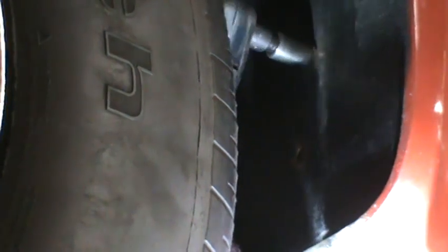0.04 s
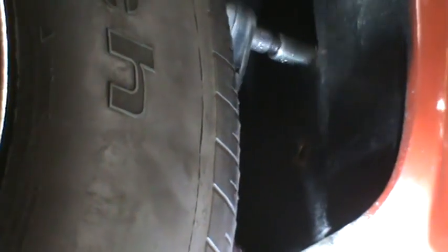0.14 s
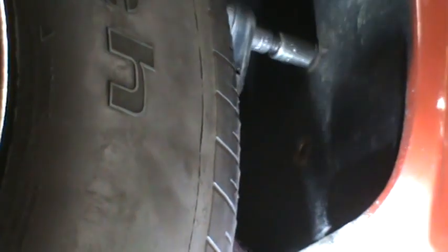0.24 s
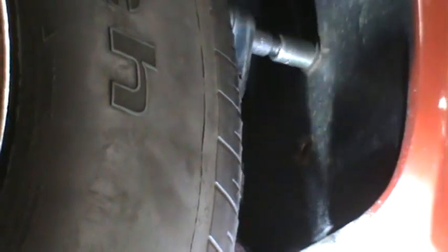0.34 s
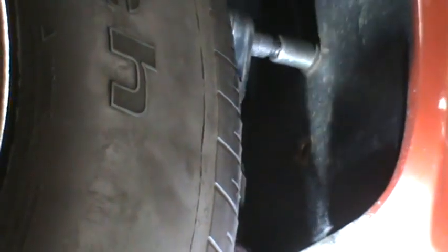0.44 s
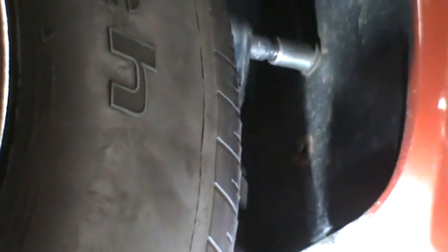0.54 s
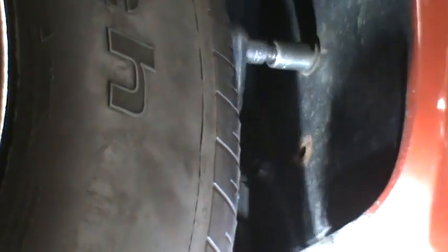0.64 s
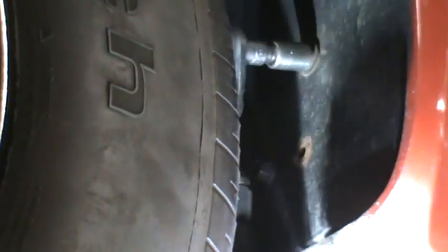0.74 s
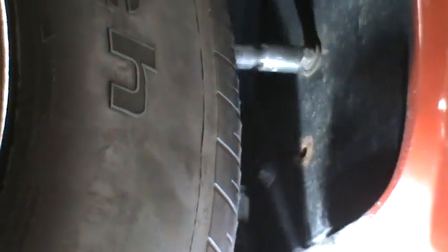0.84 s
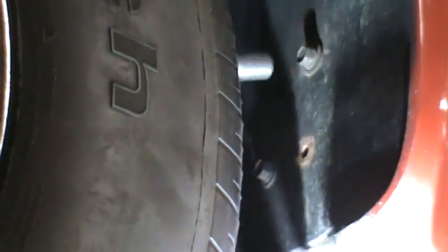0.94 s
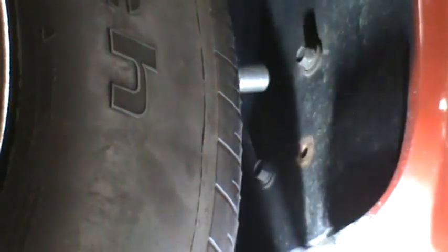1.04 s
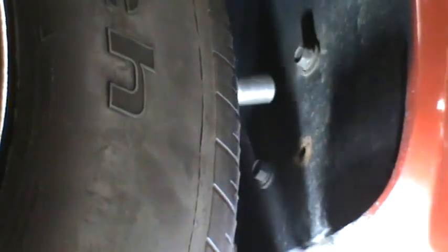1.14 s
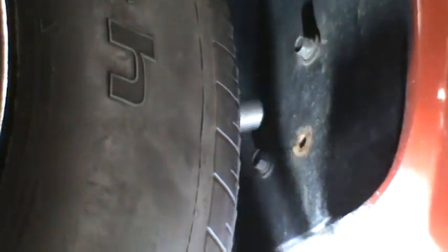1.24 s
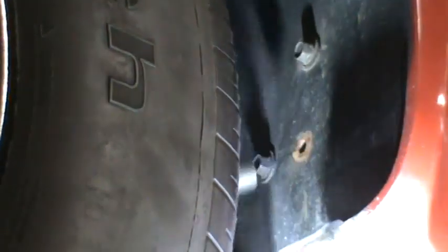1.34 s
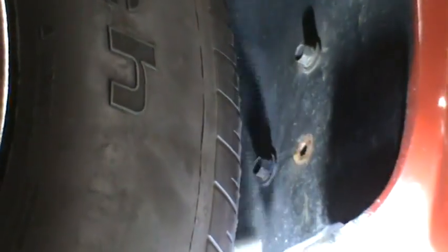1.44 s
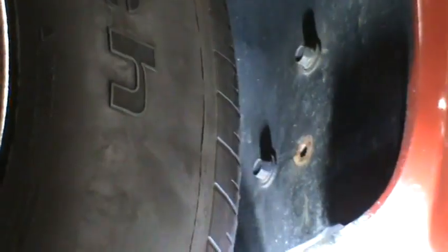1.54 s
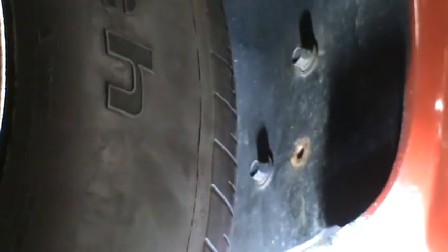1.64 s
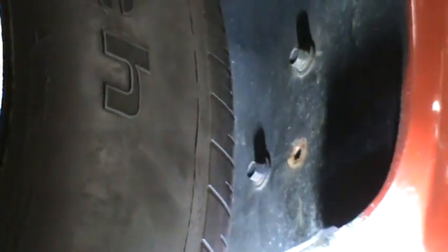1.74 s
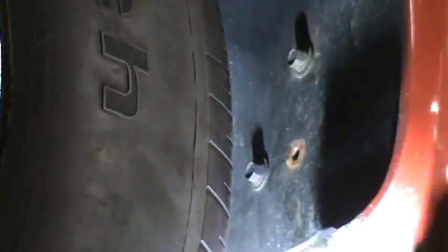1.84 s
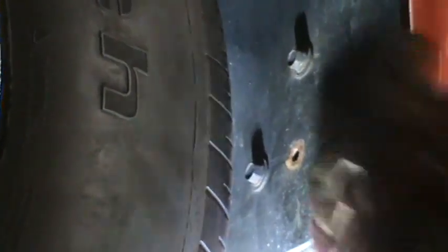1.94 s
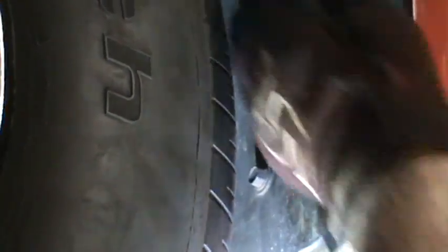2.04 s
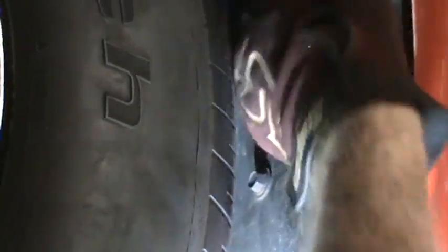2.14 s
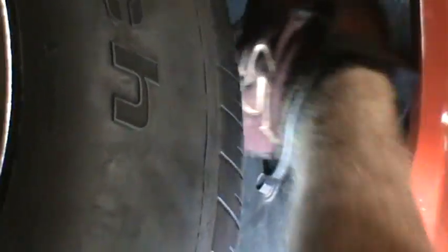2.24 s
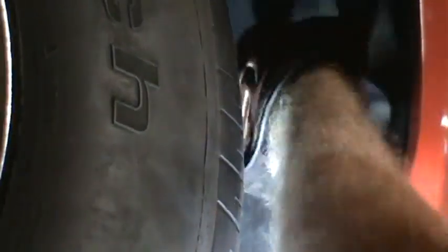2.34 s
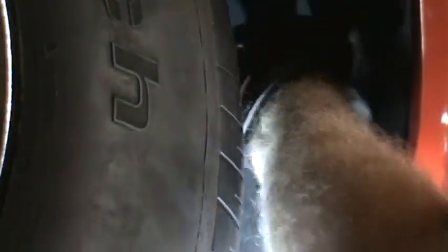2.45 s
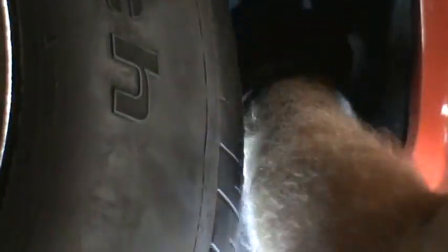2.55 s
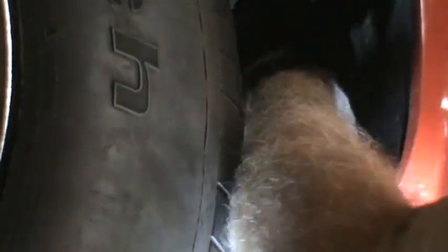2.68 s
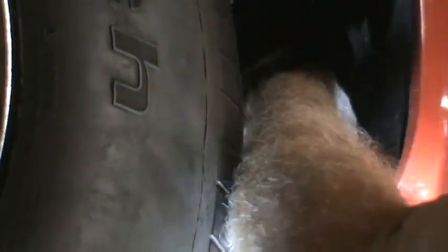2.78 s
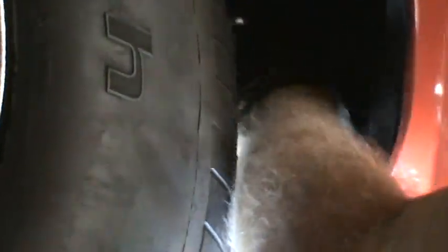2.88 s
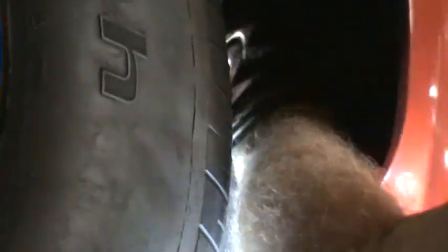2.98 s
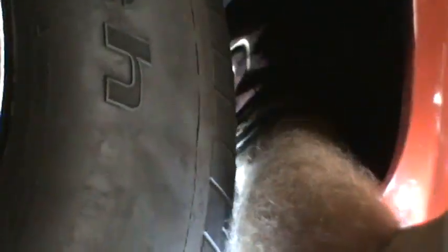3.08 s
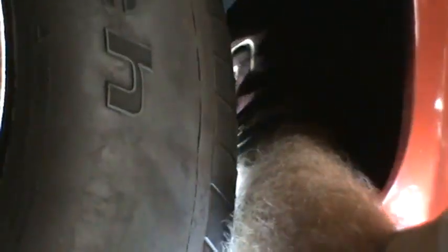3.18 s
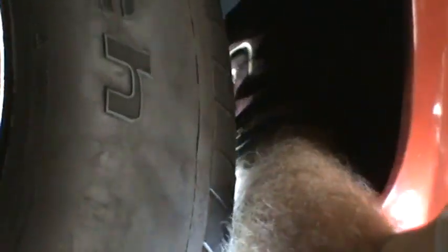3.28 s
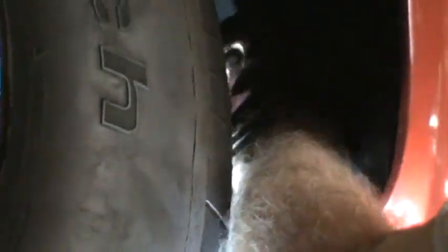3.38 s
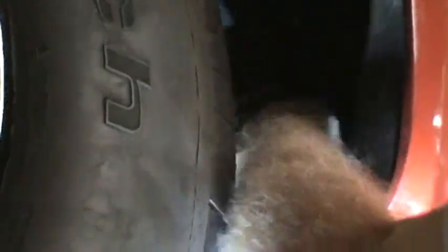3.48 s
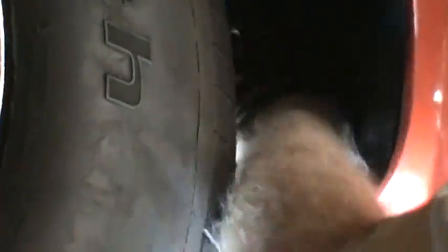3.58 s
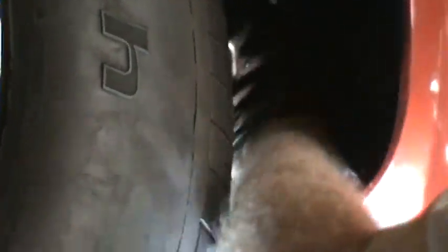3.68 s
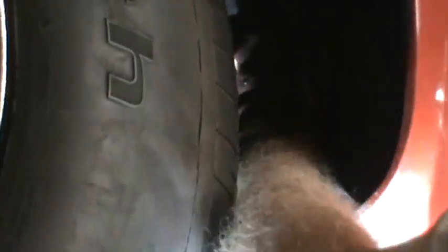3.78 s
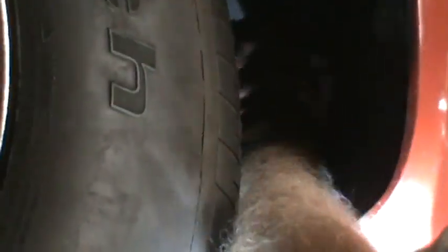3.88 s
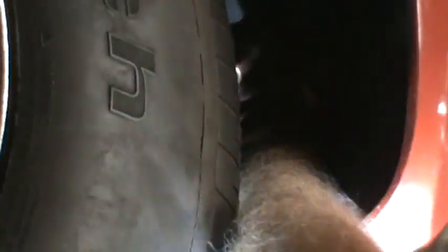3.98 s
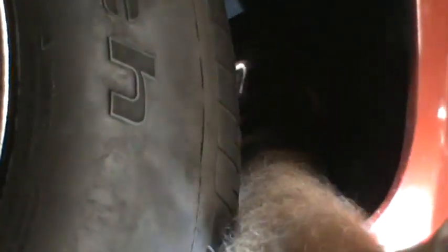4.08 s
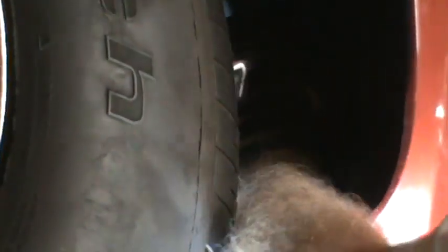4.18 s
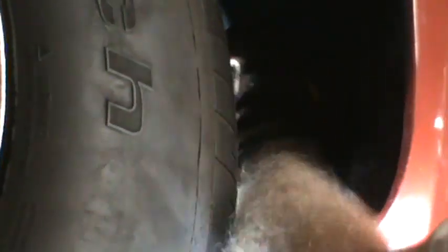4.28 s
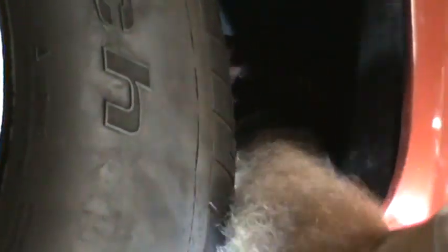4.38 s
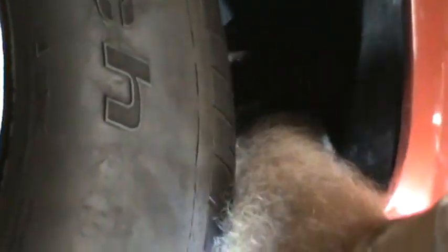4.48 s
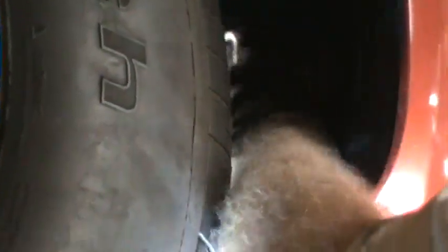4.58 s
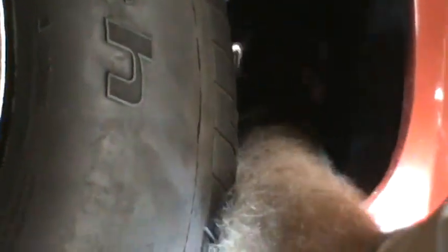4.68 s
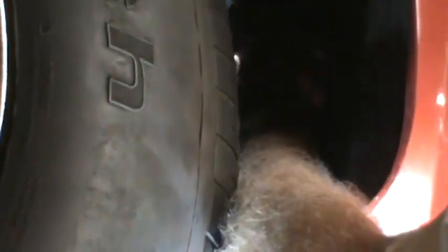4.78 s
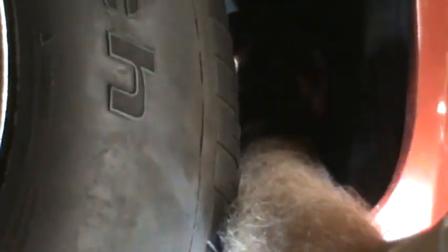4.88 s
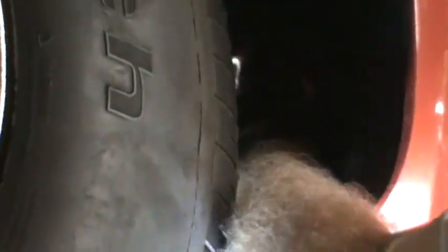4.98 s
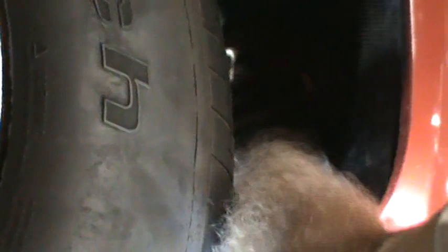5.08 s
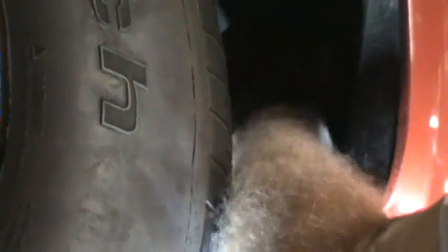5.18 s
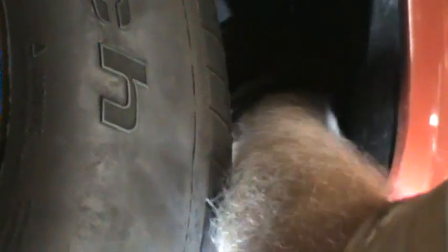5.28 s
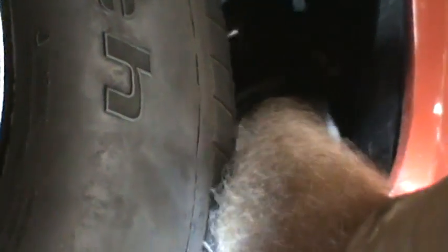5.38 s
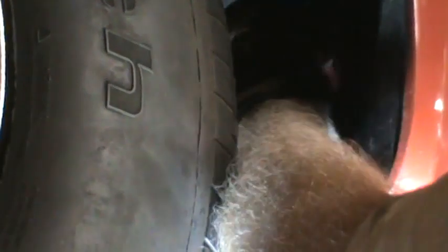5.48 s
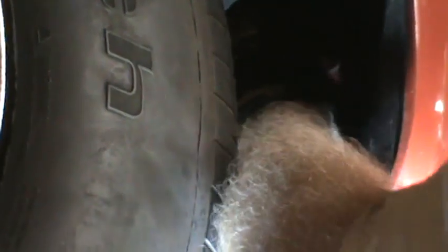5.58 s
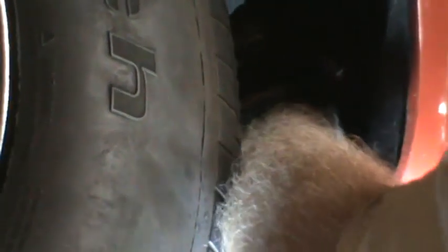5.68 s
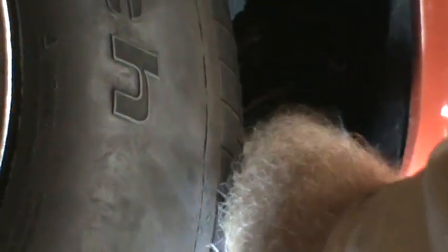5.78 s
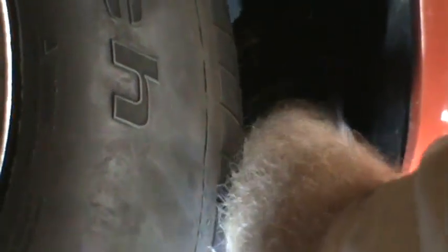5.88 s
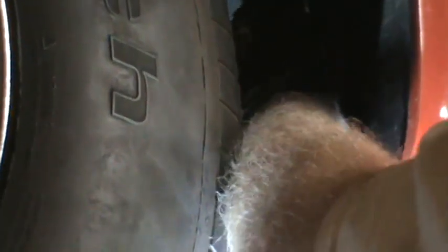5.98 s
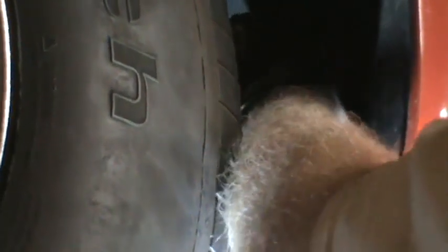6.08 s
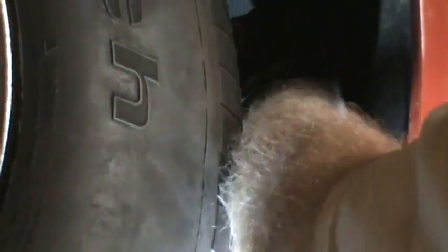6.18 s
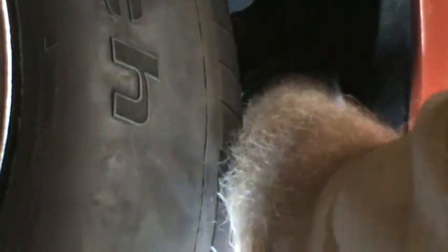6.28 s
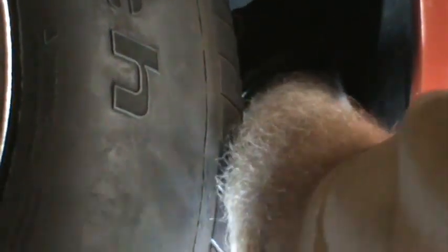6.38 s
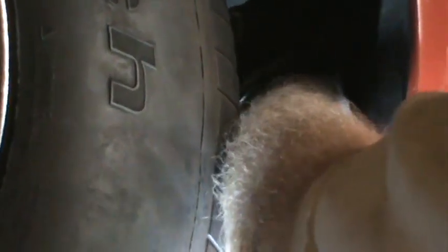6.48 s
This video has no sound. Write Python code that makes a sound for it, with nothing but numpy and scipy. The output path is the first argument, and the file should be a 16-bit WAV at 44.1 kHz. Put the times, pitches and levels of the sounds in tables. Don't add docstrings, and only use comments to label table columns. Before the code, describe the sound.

An air ratchet whines over rushing air for a second, coasts down, then metal parts knock and two heavy hollow blows ring through a garage.

```python
import sys
import numpy as np
from scipy import signal
from scipy.fft import rfft, irfft, next_fast_len
from scipy.io import wavfile
from scipy.ndimage import uniform_filter1d, minimum_filter1d, map_coordinates

SR = 44100
rng = np.random.default_rng(int(sys.argv[2]) if len(sys.argv) > 2 else 0)


def invert_db(level):
    return 10 ** (np.asarray(level, dtype=float) / 20)


def generate_wav(sig):
    pcm = np.round(np.clip(np.atleast_2d(sig).T, -1, 1) * 32767).astype(np.int16)
    wavfile.write(sys.argv[1], SR, pcm)


N = 287973

SHUT_S = 1.046
# (frequency [Hz], likeness [-1..1])
ROOM_ALIKE = [(60, 0.2), (200, 1), (1000, 0.73), (4000, 0.7), (12000, 0.5)]


def ratchet():
    # (frequency [Hz], level difference [dB])
    air_side = [(60, 5), (230, 8.6), (870, 1.8), (3310, 2.8), (12600, 1.59)]
    # (time [s], peak [dB], frequency [Hz], t60 [s])
    flares = [(1.05, -19, 2010, .15), (1.071, -12, 805, .06), (1.095, -23, 600, .05),
              (1.092, -23, 1085, 0.092), (1.12, -24, 710, .3), (1.235, -34.5, 1992, 0.28),
              (1.4, -54, 1995, 0.55)]
    shut = np.maximum(np.arange(N) / SR - SHUT_S, 0)
    whine = vane_whine()
    puffs, thin = coasting_puffs(shut)
    air = exhaust(shut)
    far = filtered(whine[:52000], lambda f: invert_db(along(((2100, -13), (2900, -2)), f)))
    wet = garage(far + invert_db(-7.5) * air[0, :len(far)])
    wet = wet + invert_db(-4.5) * garage(thin + 0.44 * puffs * (shut < .2))
    modes = damped_notes(flares, rise=0.0122, rough=.01, size=SR // 2)
    return leaning(whine + puffs + air + wet + modes, air_side)


def vane_whine():
    # (time [s], vane rate [Hz], whine [dB])
    motor = [(0.0, 839.3, -29.5), (0.03, 1001, -21), (0.055, 1030, -23), (0.19, 1001, -24),
             (0.356, 978.5, -19.5), (0.538, 980.3, -14), (0.86, 1002, -19), (1.022, 987, -17),
             (1.036, 1010, -35.5)]
    # (time [s], depth [dB], half length [s])
    nulls = [(0.046, 5, .01), (0.129, 14, 0.01), (0.235, 4, 0.023), (.77, 3, .05), (.812, 12, 0.015),
             (0.907, 6, .02)]
    # (multiple of vane rate, level at 1000 Hz [dB], slope [dB per percent of speed])
    vane_orders = [(1, -41.5, 1.5), (3, -31.5, 2), (4, -46, -5.5), (5, -30, .8), (6, -37, 3.5),
                   (7, -53, -4.5), (8, -34, 2), (9, -40, 4.5), (10, -37.5, -4), (11, -37.5, -2.3)]
    sway_db, whine_sway_db = 1.7, .8
    t = np.arange(N) / SR
    hz, whine_db, on = curves(motor)
    for s, depth_db, half in nulls:
        whine_db = whine_db - depth_db * np.exp(-((t - s) / half) ** 2)
    turn = 2 * np.pi * np.cumsum(hz * (1 + 0.0022 * wobble(60))) / SR
    sway = wobble(14)
    whine = invert_db(whine_db + 3.0 + whine_sway_db * wobble(30)) * np.sin(2 * turn)
    speed_percent = np.clip(hz / 10 - 100, -3, 2)
    for k, db, slope_db in vane_orders:
        level_db = db + slope_db * speed_percent + sway_db * np.roll(sway, -k * 9000)
        whine = whine + invert_db(level_db) * np.sin(k * turn)
    return on * whine


def coasting_puffs(shut):
    # (delay [s], gain)
    walls = [(.024, .3), (.046, 0.45), (.07, .15)]
    coast_hz, coast_s = 1079, .04
    level_db, rise_s, fade_s = -12.5, 0.01, 0.033
    turn = 2 * np.pi * coast_hz * coast_s * (1 - np.exp(-shut / coast_s))
    swell = np.minimum(shut / rise_s, 1) ** 2 * np.exp(-(shut / fade_s) ** 2) * (shut < .12)
    puffs = swell * invert_db(level_db + 1.1 * wobble(400)) * (np.sin(turn) + 0.089 * np.sin(2 * turn))
    thin = np.pad(filtered(puffs[:60000], lambda f: band(f, 410, 1400)), (0, N - 60000))
    puffs = puffs + sum(gain * np.roll(thin, round(delay * SR)) for delay, gain in walls)
    return puffs, thin


def exhaust(shut):
    # (frequency [Hz], level [dB per Hz])
    hiss = [(710, -50), (1200, -23), (1850, -12.5), (1940, -12), (2300, -13.5), (4620, -15), (5000, -12),
            (5460, -14), (10100, -10), (12000, -14), (12600, -54), (16400, -83), (22000, -120)]
    roar = [(35, -78.5), (120, -24), (235, -7.5), (366, -9.5), (440, -3), (777, -1), (1110, -3.5),
            (1800, -3), (2340, -35.5), (3960, -120)]
    # (frequency [Hz], likeness [-1..1])
    air_alike = [(60, 0.55), (200, 0.95), (600, 1), (2000, 0.31), (8000, 0.82), (12300, 0.37)]
    surge_db, surge_s, drain_db_per_s = 3.5, 0.014, 203
    kick_db, kick_s = 12.5, 0.017
    t = np.arange(N) / SR
    hiss_db = -20 + surge_db * np.exp(-((t - SHUT_S) / surge_s) ** 2) - drain_db_per_s * shut
    roar_db = -30 + kick_db * np.exp(-t / kick_s) + 3 * np.exp(-t / .25) - 60.0 * shut
    air = rush(hiss, air_alike, patchy_db=2.0, size=52000) * invert_db(hiss_db + 0.5)
    air = air + rush(roar, air_alike, patchy_db=1.5, size=52000) * invert_db(roar_db - 2.5)
    return air * np.clip((.12 - shut) / 0.032, 0, 1)


def knocks():
    # (time
    # [s], click or swish [dB], dull part over it [dB], bright part over it [dB])
    arch_hits = [(2.5461, -41.5, 11, -30), (2.9044, -46.5, 6, -21), (2.9169, -41.5, 2, 5.5),
                 (3.154, -52.5, 3, 0), (3.3603, -48.5, 12.5, -4), (3.4306, -51, -10, 1),
                 (3.4996, -10, -6.5, 0.5), (3.6214, -30.5, 5, -20), (3.6307, -15, -7, -18),
                 (4.1135, -38.5, -6, -14), (4.2085, -37, 2, -22), (4.2363, -30.5, 3, -6.5),
                 (4.2925, -30.5, -10, -22), (4.38, -37.5, 9.5, -21), (4.7282, -24.5, -10, -16),
                 (4.7978, -33, 6.5, -5.5), (4.8348, -28.5, 4.5, -11), (5.7329, -25, -14, -2),
                 (5.1865, -6.5, 0, -19), (5.428, -36, -10, -10)]
    clatter = [(1.7622, -37.5, -8, -32.5), (1.8198, -34.5, -4, -33), (1.875, -26, 3, -45),
               (1.9696, -24, -9, -16), (1.9948, -25, -10, -15), (2.0291, -36.5, 2.5, -11),
               (2.1898, -29, -3, -30), (2.3985, -31.5, -1.5, -8), (2.4691, -36, -2, -11),
               (6.1875, -37, -14, -20), (1.887, -31, 4.5, -40), (5.641, -8, -3, -24),
               (5.783, -20.5, 3.5, -30), (5.0105, -33, 5, -4), (4.634, -34.5, 9.5, -8)]
    swishes = [(1.37, -64, -10, 14), (1.985, -31, -6, -15), (2.2915, -48, -18, 1),
               (2.6401, -34.5, -8, -8.5), (2.775, -42.5, 4.5, -20), (3.922, -38.5, 1.5, -5),
               (4.027, -41.5, -12, -7), (4.5094, -33, -3, -4.5), (5.9704, -28.5, 0.5, -11),
               (6.27, -42, 3, -20), (2.98, -50, -1, -11), (3.42, -48.5, -3, -3), (4.8, -35.5, -8, -0.5),
               (4.99, -41, -3, 3)]
    # (frequency [Hz], width [Hz], level [dB])
    box = [(252, 96, -3), (445, 112, 0), (867, 300, 3)]
    # (time [s], peak [dB], frequency [Hz])
    panel = [(2.545, -37.5, 543), (2.569, -38, 550), (2.795, -41, 600), (2.906, -44, 529),
             (3.362, -42, 518), (3.428, -38, 610), (3.488, -33, 570), (3.504, -23.5, 613),
             (3.539, -28.5, 577), (3.63, -20, 598), (3.684, -35, 590), (3.945, -43, 610),
             (4.12, -46.5, 595), (4.21, -40, 630), (4.237, -41, 641), (4.29, -41, 600), (4.381, -27, 608),
             (4.409, -30, 549), (4.636, -27, 622), (4.682, -24.5, 610), (4.727, -27.5, 616),
             (4.78, -34.5, 608), (4.829, -28, 530), (4.859, -32, 529), (5.011, -29.5, 604)]
    bumps = [(1.88, -44, 265), (1.972, -36, 242), (2.021, -40, 317), (2.107, -50, 286), (2.188, -49.5, 298),
             (2.549, -58, 265), (2.796, -46, 271), (3.191, -46, 239), (3.365, -40.5, 243), (3.5, -36, 207),
             (3.571, -41, 314), (3.721, -48, 282), (4.123, -48, 239), (4.245, -35.5, 281.5),
             (4.393, -43, 221), (4.474, -42, 246), (4.541, -46, 224), (4.642, -36.5, 267),
             (4.709, -40, 219), (4.791, -32.5, 241), (4.866, -38, 242), (5.016, -35.5, 249)]
    # (time [s], peak [dB], frequency [Hz], t60 [s])
    floor_thuds = [(1.382, -43, 123, 0.22), (5.19, -29.5, 140, 0.91), (5.607, -27, 190, 1.5),
                   (5.187, -36, 38, .7), (5.187, -35, 75, 0.57), (5.2, -32, 150, .6), (.28, -53.5, 60, .12),
                   (1.05, -56, 45, .4), (5.61, -35, 48, 2)]
    panel_t60, bump_t60 = .125, 0.16
    sheet = damped_notes([(*row, panel_t60) for row in panel], rise=0.003, rough=0.041)
    sheet = sheet + damped_notes([(*row, bump_t60) for row in bumps], rise=0.0031)
    sheet = sheet + invert_db(-13) * garage(sheet)
    hits = contacts(arch_hits, box, rise=0.00031, ring=1.8, t60=0.15, wet_db=-5.0, pan_db=3.0)
    hits = hits + contacts(clatter, box, rise=0.00074, ring=0.68, t60=0.12, wet_db=2.0, pan_db=2.0)
    hits = hits + contacts(swishes, box, rise=0.06, ring=0.4, t60=0.095, wet_db=-5.5, pan_db=2.5)
    thuds = damped_notes(floor_thuds, rise=0.0045, rough=0.0285, size=SR) * invert_db([[3.5], [-3.5]])
    return hits + thuds + sheet * invert_db([[1.2], [-1.2]])


def blows():
    # (time [s], strength [dB], shudder t60 [s], brightness [dB per octave], rise [s])
    strikes = [
        (5.184, -1, 0.053, 4.5, .003),
        (5.357, -16, 0.17, -21, 0.00029),
        (5.604, -1.5, 0.17, -1, 0.00039),
    ]
    # (frequency [Hz], level [dB per Hz])
    heavy = [(18, -72), (30, -59), (229, -4.5), (407, 1.5), (439, -1), (473, -2.5), (593, 2.5), (800, -5.5),
             (1170, -5), (1360, -5), (3100, -8), (7270, -30.5), (12000, -47), (15600, -105.5),
             (22000, -120)]
    # (frequency [Hz], level [dB], t60 [s])
    drum_first = [(345, -8.5, 1.4), (592, 0, 0.66), (700, -10, 3.6), (885, -11, 0.69), (1061, -9, 0.77),
                  (1193, -12, 0.56), (1766, -3, 0.34), (1955, -19, 0.68), (2277, -22, 0.92),
                  (2700, -15, 1.4), (2870, -8, 0.38), (2960, -13, 0.68), (3117, -9, 0.53), (3370, -4, 0.41)]
    drum_second = [(242, -12, 1.7), (358.5, -5, 0.75), (443, 2.5, 0.36), (585, -13, 0.86), (940, -16, 0.42),
                   (1084, -15, 0.6), (1200, -1.5, 0.43), (1400, -22, 0.54), (1550, -18, 0.6),
                   (1701, -20, 1.0), (2099, -4.5, 0.26), (2150, -11, 0.5), (2400, -26, 0.85),
                   (2611, -18, 0.58)]
    # (frequency [Hz], level difference [dB])
    blow_side = [(60, 2.5), (170, 12), (510, 5.5), (1480, 2.5), (4330, 1.5), (12600, 1.5)]
    out, t = 0, np.arange(SR) / SR
    lead = 2000
    for (s, db, t60, tilt_db, rise), drum in zip(strikes, (drum_first, drum_first, drum_second)):
        def colour(f):
            return invert_db(along(heavy, f) + tilt_db * np.log2(np.maximum(f, 1500) / 1500))

        def placed(x):
            return invert_db(db) * np.pad(x, [(0, 0)] * (x.ndim - 1) + [(round(s * SR), N)])[..., :N]

        attack = np.minimum(t / rise, 1)
        noise = filtered(paired(rng.standard_normal((2, SR)), ROOM_ALIKE), colour)
        shudder = 0.47 * unit(noise) * invert_db(-60 * t / t60) * attack
        ring = 0
        for hz, level_db, life in drum:
            level_db = level_db + rng.normal(0, 1)
            ring = ring + invert_db(level_db - 60 * t / min(life, 1.0)) * np.sin(2 * np.pi * hz * t)
        ring = 0.22 * ring / np.abs(ring).max() * attack
        click = np.eye(1, SR + lead, lead + 30 + round(rise * SR))[0]
        impact = filtered(click, colour)[lead:]
        out = out + placed(shudder + ring + 0.95 * impact / np.abs(impact).max())
        out = out + garage(placed(invert_db(25.5) * impact / np.linalg.norm(impact) + 1.7 * ring))
    return leaning(out, blow_side)


def pings():
    # (time [s], level [dB], frequency [Hz], t60 [s])
    steel_parts = [(1.876, -37, 3300, .06), (1.879, -33, 850, .12), (1.887, -33, 480, .15),
                   (1.894, -36, 900, .1), (1.9705, -35, 3000, .05), (1.992, -38, 3100, .06),
                   (2.191, -42, 3300, .06), (2.192, -38, 480, .1), (4.237, -36, 800, .06),
                   (2.399, -44, 980, .1), (3.502, -22, 1900, .15), (3.503, -23, 1500, .15),
                   (3.51, -24, 1680, .17), (3.632, -30, 1850, .12), (4.292, -36, 1480, .07),
                   (4.383, -42, 2650, .06), (4.64, -43, 2300, .08), (5.345, -31, 4850, .06),
                   (5.74, -33, 6990, .35), (5.731, -19, 6980, .08), (5.732, -32, 8750, .06)]
    # (time [s], frequency [Hz], width [Hz], level [dB], half length [s])
    slip = (4.182, 5850, 150, -57, .035)
    s, hz, width_hz, db, half = slip
    squeak = np.sin(2 * np.pi * np.cumsum(hz + width_hz * wobble(300)) / SR)
    swell = np.clip(1 - np.abs(np.arange(N) / SR - s) / half, 0, 1)
    ping = damped_notes(steel_parts[:-2], rise=0.00042, rough=0.079)
    ping = ping + damped_notes(steel_parts[-2:], rise=0.0011, rough=0.078)
    ping = ping + invert_db(-11) * garage(ping)
    return ping + invert_db(db) * squeak * swell


def background():
    # (time [s], level [dB])
    rub = [(1.7, -70), (1.95, -60), (2.8, -59.5), (3.26, -81), (3.43, -54), (3.6, -48), (3.75, -55.5),
           (4.03, -63), (4.39, -47), (4.6, -53), (4.75, -48.5), (4.93, -53.5), (5.12, -45.5), (5.3, -52.5),
           (5.62, -43), (5.86, -35), (6.1, -47.5), (6.53, -58.5)]
    # (frequency [Hz], level [dB per Hz])
    dull_colour = [(24, -53), (40, -9), (239, 7.5), (315, 0.5), (527, 3), (1110, -7.5), (1500, -11),
                   (1950, -53), (3300, -120)]
    bright_colour = [(710, -16.5), (1200, -0.5), (2770, -10), (3540, -12), (5680, -12.5), (9200, -19),
                     (11800, -20.5), (12600, -69), (16400, -75), (22000, -120)]
    room_colour = [(12, -30.5), (20, -9), (136, 3), (203, -7.5), (783, -16), (1270, -17), (2240, -17),
                   (9880, -28), (11600, -28), (12600, -32), (16400, -71), (22000, -120)]
    rub_db, on = curves(rub)
    lumps = on * invert_db(rub_db + 1.5 * wobble(25))
    dull = invert_db(2.0) * rush(dull_colour, [(100, 1.0), (2000, 1.0)], patchy_db=-2.0)
    bright = invert_db(-1.0) * rush(bright_colour, [(2000, 0.51), (12000, 0.41)], patchy_db=.8)
    ducked_db = -8 * np.clip((SHUT_S - np.arange(N) / SR) / .03, 0, 1)
    tone = rush(room_colour, [(50, 1.0), (500, 0.92), (10000, 0.27)], patchy_db=.6)
    tone = invert_db(-59.5 + ducked_db) * tone
    return (lumps * (dull + bright) + tone) * invert_db([[1.2], [-1.2]])


def contacts(table, body, rise, ring, t60, wet_db, pan_db):
    # (frequency [Hz], width [Hz], level [dB])
    socket = [(1620, 750, 5), (2045, 35, 16.5), (2770, 1430, 6.5), (5000, 500, -14), (9300, 1600, -2.5)]
    s, db, dull_db, tick_db = np.transpose(table)
    t = np.arange(SR // 4) / SR
    shock = rng.standard_normal((len(s), 3, len(t))) * np.minimum(t / rise, 1)
    shock = shock * invert_db(-60 * t / (t60 * np.array([[.6], [1], [.8]])))

    def voices(f):
        steel = 1.1 + ring * resonant(socket)(f)
        dull = resonant(body)(f) * band(f, 118, 1090)
        click = steel * band(f, 400, 3550) * band(f, 150, 6500)
        tick = steel * band(f, 4340, 12650) ** 2
        return np.array([dull, click, tick])

    parts = filtered(shock, voices)
    parts = parts / np.abs(parts).max(axis=2, keepdims=True)
    levels = invert_db(db[:, None] - 3.0 + np.transpose([dull_db, 0 * db, tick_db]))
    hits = np.sum(parts * levels[..., None], axis=1)
    dry = np.zeros((2, N + SR))
    for k, hit in enumerate(hits):
        dry[k % 2, round(s[k] * SR):][:len(t)] += hit
    wet = garage(dry[0, :N]) + garage(dry[1, :N])
    return (dry.sum(axis=0)[:N] + invert_db(wet_db) * wet) * invert_db([[pan_db / 2], [-pan_db / 2]])


def damped_notes(table, rise, rough=0.029, size=SR // 4):
    x, t = np.zeros(N + SR), np.arange(size) / SR
    for s, db, hz, t60 in table:
        drift = np.cumsum(rng.standard_normal(len(t))) * rough
        envelope = invert_db(db - 60 * t / max(t60, .01)) * np.minimum(t / rise, 1)
        x[round(s * SR):][:len(t)] += envelope * np.sin(2 * np.pi * hz * t + drift)
    return x[:N]


def rush(spectrum, alike, patchy_db, size=N):
    z = signal.stft(rng.standard_normal((2, size)), nperseg=1024)[2]
    field = uniform_filter1d(rng.standard_normal(z.shape[1:]), size=12, axis=0)
    field = uniform_filter1d(field, size=4, axis=1)
    pair = signal.istft(z * invert_db(patchy_db * unit(field)), nperseg=1024)[1][:, :size]
    return np.pad(unit(paired(pair, alike, spectrum)), ((0, 0), (0, N - size)))


def garage(x):
    # (frequency [Hz], t60 [s])
    room_t60 = [(60, 0.32), (170, 1.2), (300, 0.79), (700, 0.72), (2000, 0.64), (5000, 0.58), (11000, 0.36)]
    hz, t, z = signal.stft(rng.standard_normal((2, SR)), SR, nperseg=256)
    decay = invert_db(-60 * t / along(room_t60, hz)[:, None])
    tail = paired(signal.istft(z * decay, SR, nperseg=256)[1], ROOM_ALIKE)
    tail = tail * np.minimum(np.arange(tail.shape[1]) / (0.0038 * SR), 1)
    tail = np.pad(tail, ((0, 0), (150, 0)))
    first, last = np.flatnonzero(x)[[0, -1]]
    wet = signal.fftconvolve(x[None, first:last + 1], tail / np.linalg.norm(tail[0]), axes=1)
    return np.pad(wet, ((0, 0), (first, N)))[:, :N]


def paired(pair, alike, spectrum=((1, 0),)):
    def mid_side(hz):
        turn = np.arccos(np.clip(along(alike, hz), -1, 1)) / 2
        return invert_db(along(spectrum, hz)) * [np.cos(turn), np.sin(turn)]

    mid, side = filtered(pair, mid_side)
    return np.array([mid + side, mid - side])


def leaning(x, balance):
    return filtered(x, lambda hz: invert_db(along(balance, hz) * [[.5], [-.5]]))


def resonant(modes):
    def response(f):
        total = 0
        for k, (c, w, db) in enumerate(modes):
            total = total + (-1) ** k * invert_db(db) * 1j * f * w / (c * c - f * f + 1j * f * w)
        return total
    return response


def band(f, lo_hz, hi_hz):
    return resonant([(np.sqrt(lo_hz * hi_hz), hi_hz - lo_hz, 0)])(f) ** 2


def filtered(x, response):
    m = next_fast_len(x.shape[-1] + SR // 4)
    return irfft(rfft(x, m) * response(np.fft.rfftfreq(m, 1 / SR)), m)[..., :x.shape[-1]]


def along(points, hz):
    f, v = np.transpose(points)
    return np.interp(np.log(hz + 1), np.log(f + 1), v)


def curves(rows):
    s, *cols = np.transpose(rows)
    t = np.arange(N) / SR
    return [np.interp(t, s, c) for c in cols] + [(t >= s[0]) * (t <= s[-1])]


def wobble(rate):
    knots = rng.standard_normal(int(N * rate / SR) + 4)
    return map_coordinates(knots, [np.arange(N) * rate / SR])


def unit(x):
    return x / np.sqrt(np.mean(x ** 2) + 1e-20)


def starved(x):
    starved_hz, starved_db = 7500, -40
    hz, _, z = signal.stft(x, SR, nperseg=1024)
    power = np.mean(np.abs(z) ** 2, axis=0) + 1e-16
    bands = np.repeat(power[:-1].reshape(32, 16, -1).sum(axis=1), 16, axis=0)
    share_db = uniform_filter1d(10 * np.log10(bands / power.sum(axis=0)), size=3, axis=1)
    lost = np.clip((starved_db - share_db) / 2, 0, 1) * (hz[:-1, None] > starved_hz)
    return signal.istft(z * np.pad(1 - lost, ((0, 1), (0, 0))), SR, nperseg=1024)[1][:, :N]


def scene():
    return ratchet() + knocks() + blows() + pings() + background()


def low_pass(x):
    return signal.sosfilt(signal.butter(12, 13210, fs=SR, output="sos"), x)


def record(dry):
    level = np.sqrt(np.abs(uniform_filter1d(np.mean(dry ** 2, axis=0), size=600)))
    gain = minimum_filter1d(np.minimum(1, invert_db(-12.5) / (level + 1e-9)), size=900)
    held = dry * uniform_filter1d(gain, size=700)
    held = held / (1 + np.abs(held / .95) ** 6) ** (1 / 6)
    top_hz = 12400
    mix = filtered(starved(held), lambda hz: np.clip((top_hz - hz) / 500, 0, 1) * hz ** 2 / (hz ** 2 + 45 ** 2))
    return low_pass(mix)


dry = scene()
out = record(dry)
generate_wav(out)
```